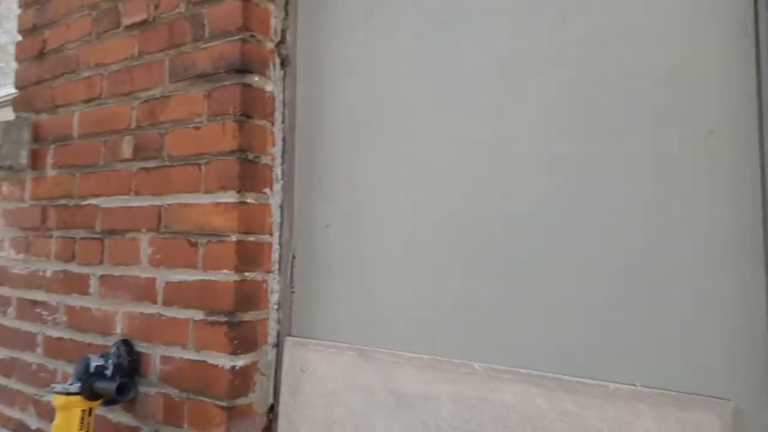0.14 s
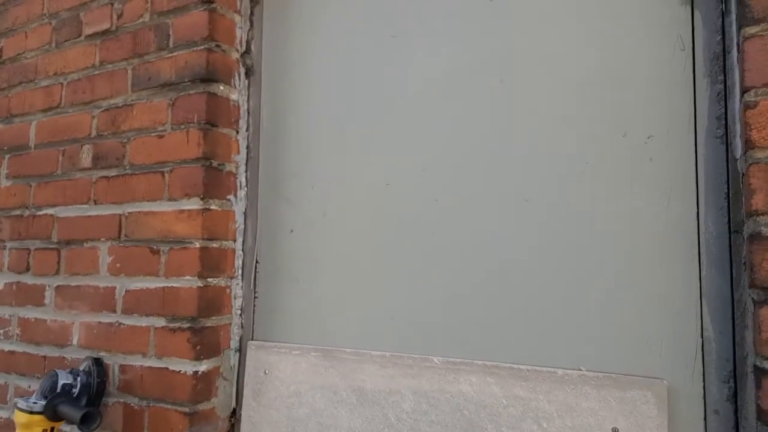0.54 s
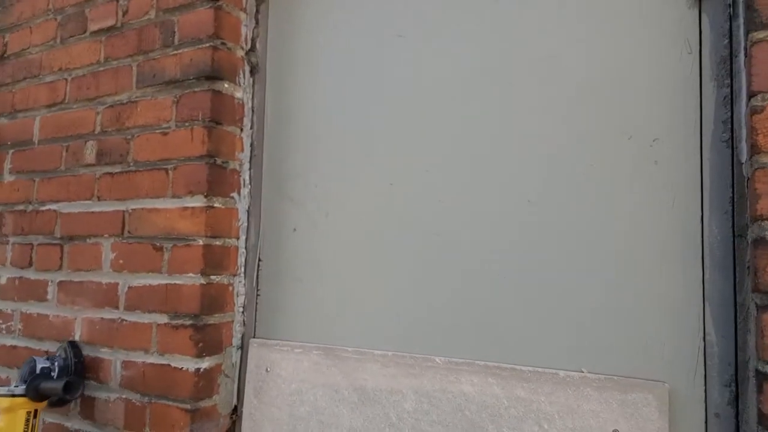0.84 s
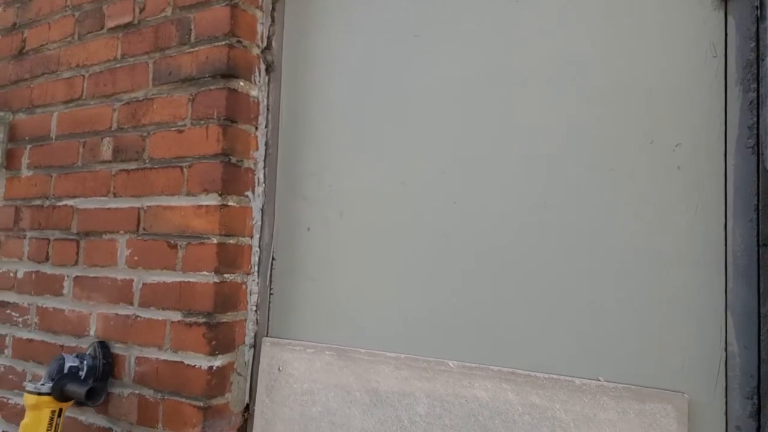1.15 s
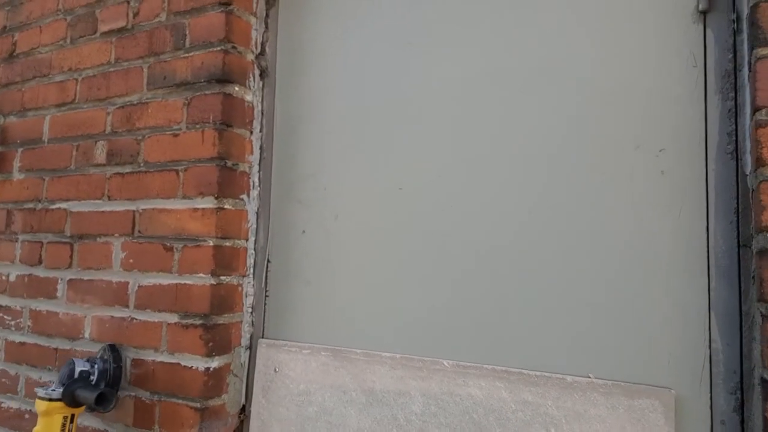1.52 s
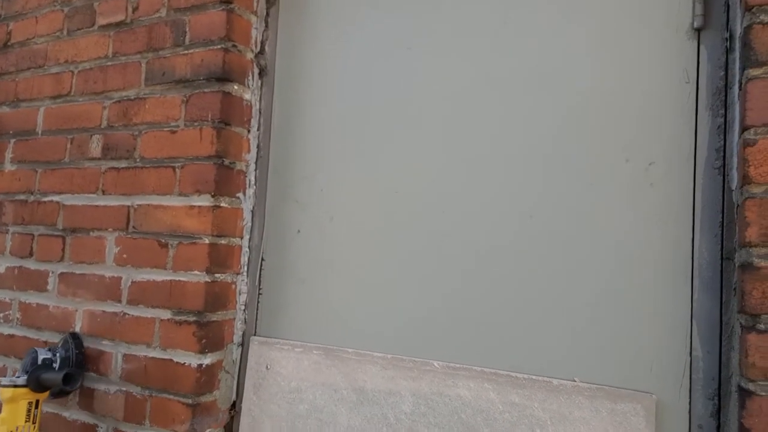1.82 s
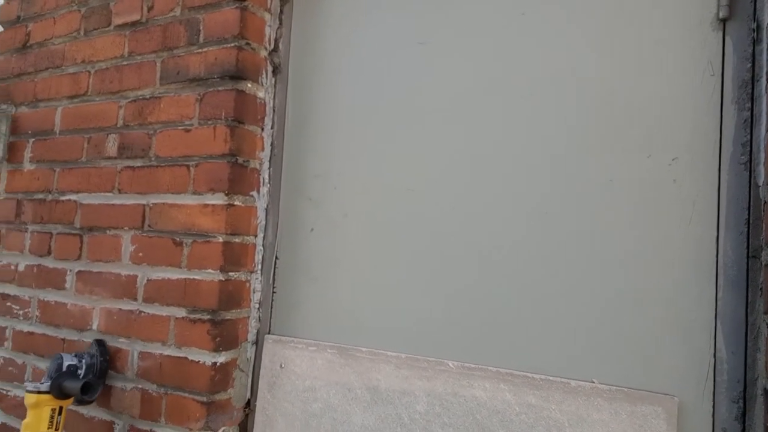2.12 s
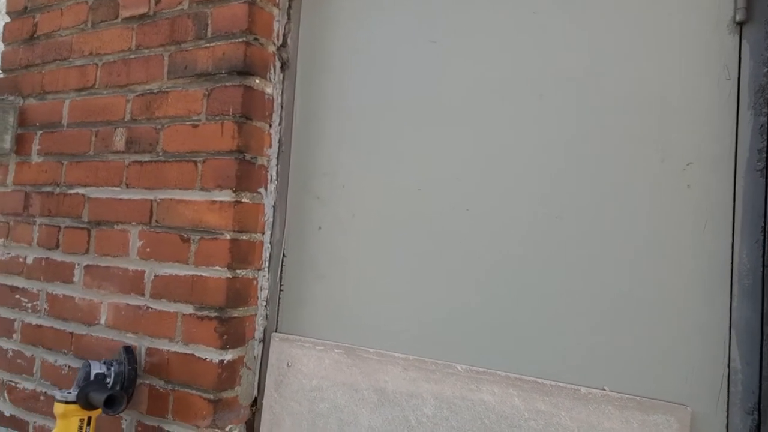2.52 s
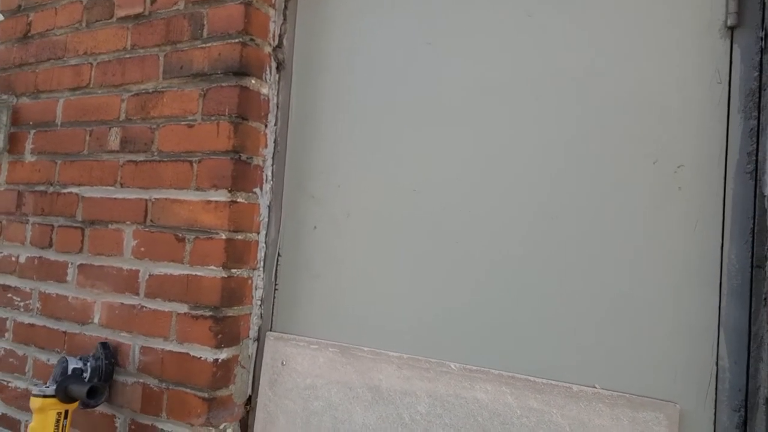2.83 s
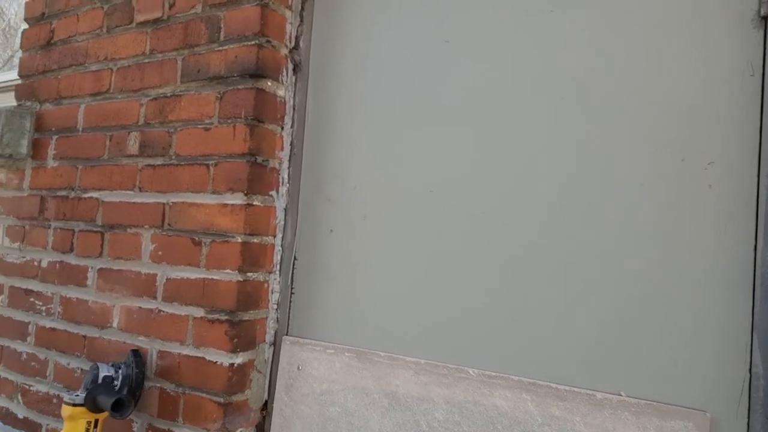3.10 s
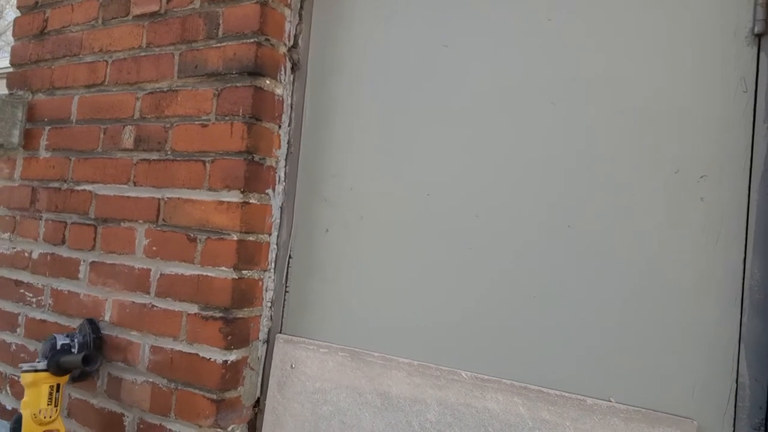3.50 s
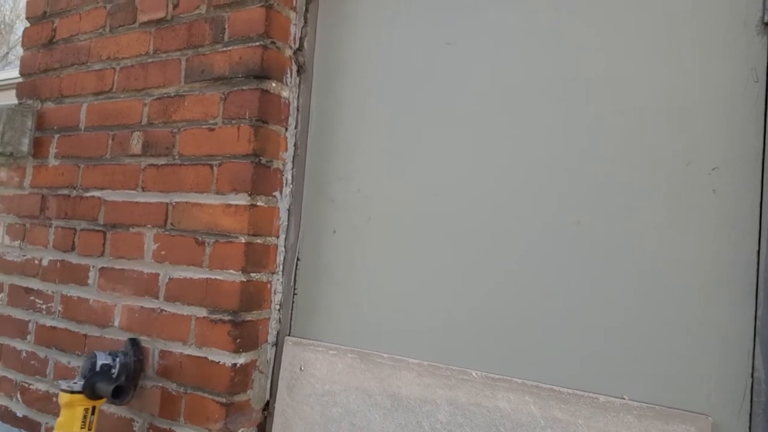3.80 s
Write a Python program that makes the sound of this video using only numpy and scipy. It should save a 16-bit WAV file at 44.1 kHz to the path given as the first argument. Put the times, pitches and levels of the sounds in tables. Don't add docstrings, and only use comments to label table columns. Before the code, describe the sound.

An angle grinder is already cutting mortar from brick outdoors and continues for about 4 seconds without stopping. Bright, fast-pulsing gritty hiss covers a motor rush and wavering whine around 1 to 2 kHz, with pitch sagging slightly. Low wind thumps hit the left and right microphones unevenly, hardest near 0.7 s, lulling around 2 s, returning after 2.5 s. The metallic ring swells near 3.4 s.

```python
import sys
import numpy as np
from scipy import signal
from scipy.fft import rfft, irfft
from scipy.io import wavfile
from scipy.ndimage import uniform_filter1d, map_coordinates

SR = 44100
rng = np.random.default_rng(int(sys.argv[2]) if len(sys.argv) > 2 else 0)


def voltage_ratio(level):
    return 10 ** (np.asarray(level, float) / 20)


def output_pcm(signal):
    pcm = np.clip(np.atleast_2d(signal).T, -1, 1) * 32767
    wavfile.write(sys.argv[1], SR, np.round(pcm).astype(np.int16))


N = 174195
TIME = np.arange(N) / SR
FREQ = np.maximum(np.fft.rfftfreq(N, 1 / SR), 1)


def curve(table, k=1):
    return np.interp(TIME, np.array(table)[:, 0], np.array(table)[:, k])


def over_hz(table, k=1, **ends):
    return np.interp(np.log(FREQ), np.log(np.array(table)[:, 0]), np.array(table)[:, k], **ends)


def colour(x, table):
    shaped = irfft(rfft(x) * voltage_ratio(over_hz(table, left=-45, right=-20)), N)
    return shaped / np.sqrt(np.mean(shaped ** 2))


def walk(rate):
    hold = int(SR / rate)
    draws = rng.standard_normal(int(N * 200 / SR) + 9)[:N // hold + 1]
    held = np.repeat(draws, hold)
    return 1.3 * uniform_filter1d(uniform_filter1d(held, hold), hold)[:N]


def patchy(x, lo_hz, slow_db, quick_db):
    spectrum, total, last = rfft(x), 0, walk(6.1)
    for centre_hz in lo_hz * 2 ** np.arange(0, 4.1, 1 / 3):
        mask = np.cos(np.pi / 2 * np.clip(3 * np.log2(FREQ / centre_hz), -1, 1)) ** 2
        own = walk(3.88)
        swell_db = slow_db * 0.16 * (own + last) + quick_db * walk(18)
        total = total + irfft(spectrum * mask, N) * voltage_ratio(swell_db)
        last = own
    return total


def tone(f):
    return np.sqrt(2) * np.sin(2 * np.pi * np.cumsum(f) / SR)


def pair(near, other=None):
    # (frequency [Hz], likeness of the microphones [0-1], left over right [dB])
    space = [(300, 0.66, 2.5), (900, 0.9, 1), (2380, 0.77, 3), (3600, 0.53, 1), (4920, 1, 4),
             (7300, 0.1, 4), (8440, 0.53, 1.5), (12800, 0, 3)]
    right_lag_s = 0.0001952
    like, tilt = np.clip(over_hz(space), 0, 1), voltage_ratio(over_hz(space, k=2) / 2)
    left = rfft(near)
    right = left if other is None else like * left + np.sqrt(1 - like ** 2) * rfft(other)
    delay = np.exp(-2j * np.pi * FREQ * right_lag_s)
    return irfft(np.array([left * tilt, right / tilt * delay]), N)


def wind():
    # (time [s], gust level [dB])
    gusts = [(0.0, -48), (0.24, -45), (0.44, -42.5), (0.9, -38), (1.26, -42.5), (1.39, -39), (1.48, -45),
             (2.03, -47), (2.24, -51.5), (2.55, -45.5), (2.95, -45), (3.06, -47), (3.51, -44),
             (3.95, -39.5)]
    # (time [s], peak [dB], left over right [dB], width [s])
    buffets = [(0.038, -32, 4, 0.008), (0.178, -39, -4.0, 0.0064), (0.211, -34.0, 2, 0.0094),
               (0.261, -37, 5, 0.0081), (0.356, -33, -3, 0.007), (0.501, -38, 1, 0.0055),
               (0.685, -30.5, 9, 0.007), (0.706, -19.5, -4, 0.0065), (0.768, -41, 19, 0.0062),
               (0.85, -27, 10, 0.0056), (0.985, -42, 6, 0.007), (1.006, -38, 14, 0.0063),
               (1.087, -30, 5, 0.011), (1.144, -32, -2.0, 0.007), (1.174, -33.0, 3.0, 0.007),
               (1.253, -36, 2, 0.0062), (1.281, -31, 2, 0.0053), (1.313, -35, -6, 0.005),
               (1.361, -31, 5, 0.007), (1.414, -30.5, 1.0, 0.0083), (1.484, -40, -1, 0.007),
               (1.618, -28, 5, 0.0056), (1.672, -32.5, 2, 0.0061), (1.697, -35, -3.0, 0.0065),
               (1.724, -40, 0, 0.0087), (1.772, -43, 1.0, 0.0048), (1.807, -41, 1.0, 0.0052),
               (1.836, -36.0, 3.0, 0.0075), (2.56, -27.0, 0.0, 0.0081), (2.606, -34, 2.0, 0.0092),
               (2.923, -29, 0, 0.0083), (2.953, -35.0, 5.0, 0.007), (2.988, -33, -2, 0.008),
               (3.037, -38, 3.0, 0.007), (3.16, -31, -9, 0.007), (3.231, -25.5, -3, 0.0076),
               (3.265, -38, 9.0, 0.0063), (3.369, -37, 6, 0.0085), (3.482, -27.5, 1.0, 0.0062),
               (3.531, -35, -3, 0.0059), (3.591, -25.5, 4.0, 0.007), (3.621, -33, -4.0, 0.007),
               (3.71, -26.0, 0, 0.0087), (3.736, -23.5, -4, 0.0092), (3.778, -26, -3.0, 0.008),
               (3.821, -31, 2, 0.007), (3.848, -33, 5, 0.007), (3.932, -34, -5, 0.0064)]
    # (frequency [Hz], density [dB per Hz])
    rumble = [(20, -20), (45, -6), (100, 3.5), (160, -7), (300, -5.5), (500, -11.5), (900, -23)]
    wind_db, buffet_db, likeness = 2, -2, 0.043
    thump_hz, thump_db, thump_spread = 106, -5.5, 0.22
    side = np.array([[.5], [-.5]])
    own_db = 2.5 * np.array([walk(14), walk(17)])
    puffs = voltage_ratio(curve(gusts) + wind_db + 1.5 * walk(18) + own_db)
    thumps, chance = np.zeros((2, N)), rng.standard_normal((60, 2, 2, 1))
    for (t, peak_db, pan_db, width_s), (pitch, phase) in zip(buffets, chance):
        around = slice(max(int((t - .05) * SR), 0), int((t + .05) * SR))
        lag = TIME[around] - t
        bump = voltage_ratio(peak_db + side * pan_db) * np.exp(-.5 * (lag / width_s) ** 2)
        puffs[:, around] += voltage_ratio(buffet_db) * bump
        cycle = 2 * np.pi * thump_hz * np.exp(thump_spread * pitch) * lag
        thumps[:, around] += voltage_ratio(thump_db) * bump * np.cos(cycle + 2 * phase)
    left, other = colour(rng.standard_normal((2, N)), rumble)
    air = np.array([left, likeness * left + np.sqrt(1 - min(likeness, 1) ** 2) * other])
    loudness = np.sqrt(uniform_filter1d(uniform_filter1d(air ** 2, 900), 900))
    return air / loudness * puffs + thumps


def armature(turn_hz):
    return tone(3.55 * turn_hz) * voltage_ratio(-52.5 + 2.9 * walk(5.41))


def bearing():
    # (time [s], whine frequency [Hz], level [dB])
    whine = [(0.15, 1064, -45), (0.28, 1059, -37.5), (0.59, 1053, -42), (0.88, 1039, -37.5),
             (1.11, 1063, -40), (1.25, 1039, -38), (1.34, 1042, -43), (1.84, 1036, -37.5),
             (1.88, 1030, -44), (2.0, 1043, -39), (2.04, 1032, -45), (2.09, 1045, -39.5), (2.45, 1033, -39),
             (2.49, 1029, -44.5), (2.8, 1032, -36), (2.94, 1035, -42), (3.36, 1028, -38.5),
             (3.93, 1025, -43)]
    whine_db, wobble, flutter_db, rise_s = 2.5, 0.00291, 1, 0.22
    drops_db = np.minimum(walk(25.6) + 1.63, 0) * 8
    sound = tone(curve(whine) * (1 + wobble * walk(6.9) + 0.00498 * walk(45)))
    whine_level_db = curve(whine, k=2) + whine_db + flutter_db * walk(16) + drops_db
    return sound * voltage_ratio(whine_level_db) * np.clip(TIME / rise_s, .6, 1)


def disc(turn_hz):
    # (multiple of the turn rate [-], level [dB])
    multiples = [(3, -59.5), (6, -56), (12, -57.5), (14, -51.5), (15, -41.5), (16, -40), (17, -54),
                 (19.6, -53.5), (32, -39), (60, -40), (72, -49)]
    # (time [s], share of the 15th multiple [dB], share of the 16th [dB])
    flex = [
        (0, -1.5, -7.5),
        (1.1, -5, -4.5),
        (1.3, -0.5, -8),
        (1.75, 0, -4),
        (1.9, -10, -17),
        (2.25, -4, -1),
        (3.3, -2, 3.5),
        (3.5, -16, -12),
    ]
    swell_db = 2.5
    share_db = {15: curve(flex), 16: curve(flex, k=2)}
    total = 0
    for m, mean_db in multiples:
        ringing = tone(m * turn_hz * (1 + 0.002196 * walk(12)))
        total = total + ringing * voltage_ratio(mean_db + swell_db * walk(5.09) + share_db.get(m, 0))
    return total


def body(turns):
    # (frequency [Hz], density [dB per Hz])
    housing = [(150, -53), (350, -21), (550, -20), (900, -11.5), (1300, -14), (2300, -15.5), (3400, -9),
               (4200, -15.5)]
    gate = voltage_ratio(0.23 * np.cos(2 * np.pi * turns))
    noise = patchy(rng.standard_normal((2, N)) * gate, 277, slow_db=-1.0, quick_db=1.5)
    return pair(*colour(noise, housing)) * voltage_ratio(-32)


def grit(turns):
    # (time [s], cutting level [dB], bite of the low band [dB])
    cut = [(0.0, -21.5, -5), (0.02, -26, -7), (0.04, -20, -4), (0.2, -21.5, -5), (0.31, -23.5, -6.5),
           (0.41, -20.5, -11), (0.7, -22, -5.5), (0.75, -25, -4), (0.88, -23.5, -11), (1.08, -24.5, -4),
           (1.36, -21.5, -7.5), (1.97, -24.5, -5), (2.29, -22.5, -7), (2.87, -22.5, -9), (2.95, -24.5, -7),
           (3.23, -22, -8), (3.65, -23.5, -4), (3.95, -22.5, -5)]
    # (frequency [Hz], density [dB per Hz])
    grain_spectrum = [(2600, -35), (4200, -8), (5500, -3), (7600, 0), (8100, -12.5), (9500, -5), (11500, 1),
                      (15700, -1.5)]
    # (time [s], once-a-turn depth [dB])
    runout = [
        (0, 5),
        (.3, 2.6),
        (1.0, 3),
        (1.6, 1.6),
        (1.9, 3),
        (3.2, 1.8),
        (3.6, 3.6),
        (3.95, 2),
    ]
    grit_db, bite_top_hz, middle_share = 5, 8000, 0.25
    phase = 2 * np.pi * (turns - .08)
    pulse = np.cos(phase) - .3 * np.sin(2 * phase)
    bite = rng.standard_normal(500)[(turns + .3).astype(int)]
    gate = voltage_ratio(curve(runout) * (pulse + 0.12 * bite) + 1.16 * walk(150) + .5 * walk(9))
    grains = rng.standard_normal((2, N)) * voltage_ratio(0.37 * rng.exponential(size=N))
    sound = colour(patchy(grains * gate, 1029, slow_db=-0.7, quick_db=1.44), grain_spectrum)
    low = irfft(rfft(sound) / (1 + (FREQ / bite_top_hz) ** 20), N)
    deep = irfft(rfft(sound) / (1 + (FREQ / 5800) ** 8), N)
    cut_db = curve(cut)
    low_db = cut_db + curve(cut, k=2) + 5
    deep_db = middle_share * low_db + (1 - middle_share) * cut_db.mean()
    cutting = deep * voltage_ratio(deep_db) + (low - deep) * voltage_ratio(low_db) + (sound - low) * voltage_ratio(cut_db)
    return pair(*cutting) * voltage_ratio(grit_db)


def guard(x):
    # (time [s], ring of the guard [dB])
    ring_table = [(0, 0), (.6, -0.5), (1.0, -3), (1.25, 3), (1.4, -1.5), (1.75, 4), (1.95, -1), (2.75, 2.5),
                  (2.9, -2.5), (3.2, 3), (3.4, 4.5), (3.55, 0), (3.75, -1.5), (3.95, 0.5)]
    centre_hz, spread_hz = 3200, 850
    ring = irfft(rfft(x) * np.exp(-.5 * ((FREQ - centre_hz) / spread_hz) ** 2), N)
    return x + ring * (voltage_ratio(curve(ring_table)) - 1)


def swing(x):
    # (time [s], extra lag of the right microphone [s])
    extra_lag = [(0, -3e-5), (.15, -4e-5), (.3, -1e-5), (.45, -3e-5), (.58, 1.5e-5), (.72, -3e-5),
                 (.95, 0.5e-5), (1.2, -4e-5), (1.45, -1e-5), (1.85, -1.5e-5), (2.05, 1e-5), (2.45, -2e-5),
                 (2.8, 1.5e-5), (3.0, -1e-5), (3.35, 1.5e-5), (3.6, -2e-5), (3.75, 2.5e-5), (3.95, 0.5e-5)]
    heard = (TIME - curve(extra_lag)) * SR
    return np.array([x[0], map_coordinates(x[1], [heard], order=5, mode="mirror")])


def scene():
    # (time [s], disc turn rate [Hz])
    speed = [(0, 108.8), (.45, 108.3), (.7, 107.4), (1.15, 108.0), (1.4, 107.0), (1.8, 106.2), (2.1, 106.8),
             (2.3, 106.3), (3.0, 105.6), (3.5, 105.1), (3.95, 105.1)]
    turn_hz = curve(speed)
    turns = np.cumsum(turn_hz) / SR
    tones = pair(disc(turn_hz) + bearing() + armature(turn_hz))
    grinder = grit(turns) + body(turns) + tones
    return swing(guard(grinder)) + wind()


def top_cut(x):
    return signal.sosfilt(signal.butter(12, 16500, fs=SR, output="sos"), x)


def record(dry):
    ceiling, top_hz = .95, 15780
    rounded = ceiling * np.tanh(dry / ceiling)
    mix = irfft(rfft(rounded) * np.clip((top_hz - FREQ) / 120, 0, 1), N)
    return top_cut(mix)


dry = scene()
out = record(dry)
output_pcm(out)
```